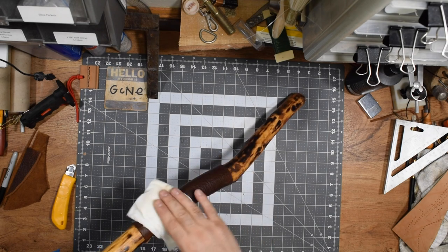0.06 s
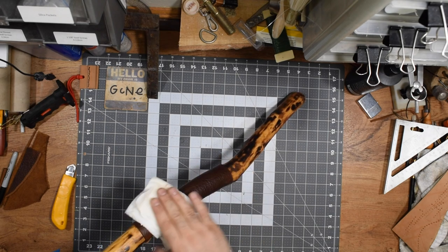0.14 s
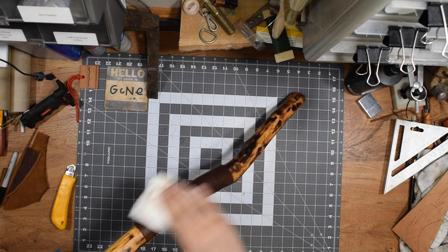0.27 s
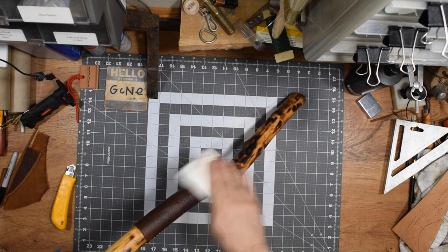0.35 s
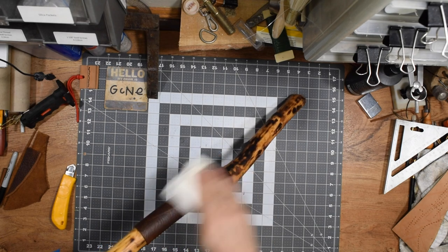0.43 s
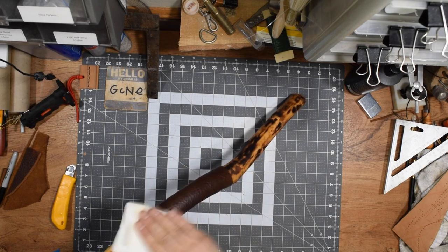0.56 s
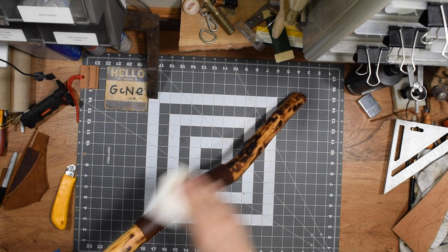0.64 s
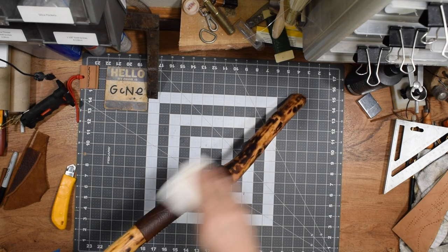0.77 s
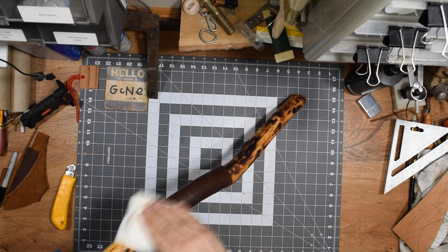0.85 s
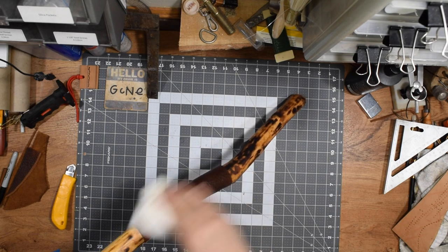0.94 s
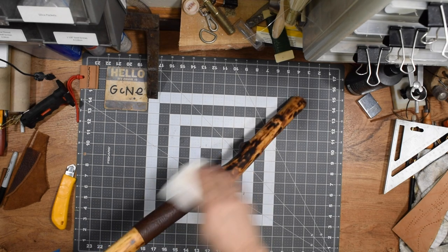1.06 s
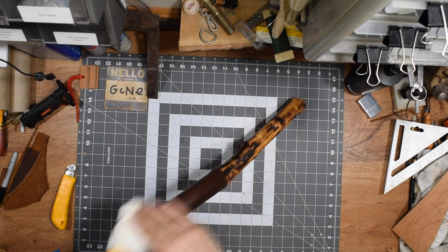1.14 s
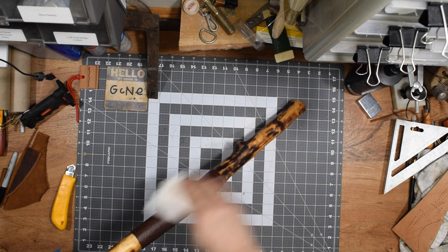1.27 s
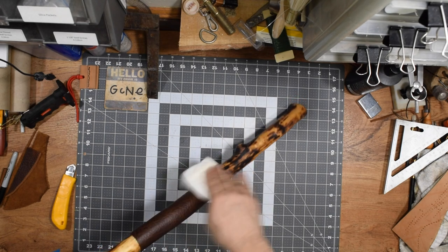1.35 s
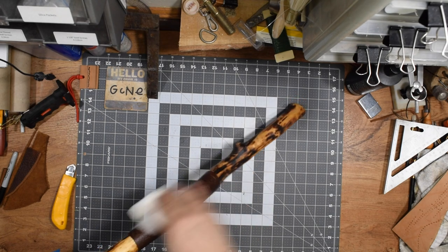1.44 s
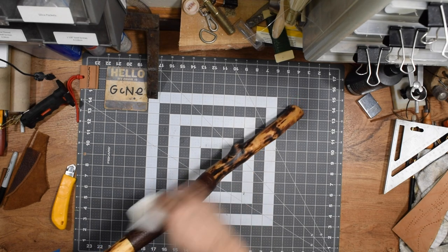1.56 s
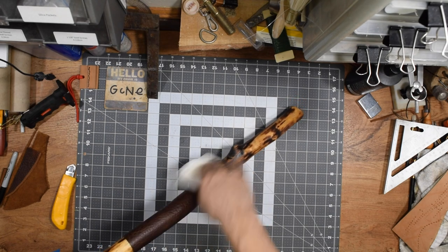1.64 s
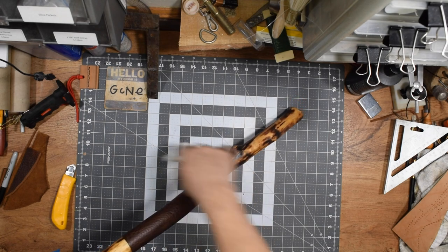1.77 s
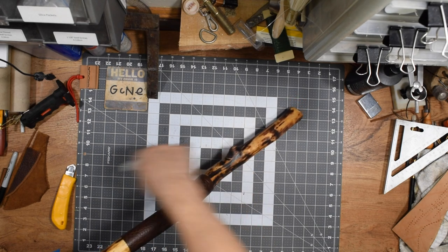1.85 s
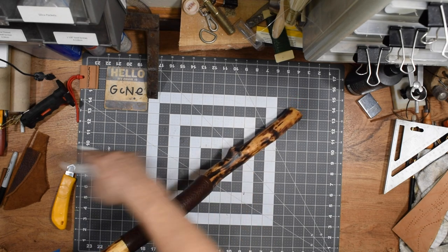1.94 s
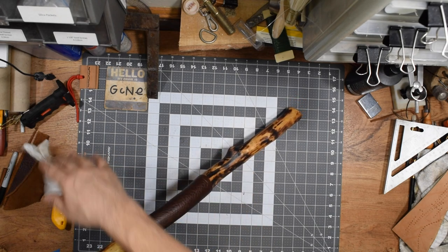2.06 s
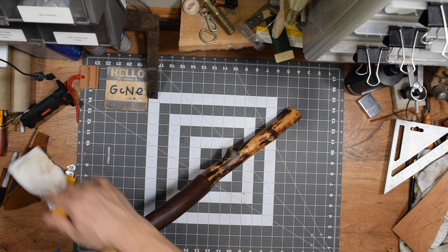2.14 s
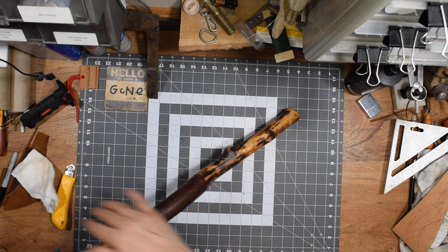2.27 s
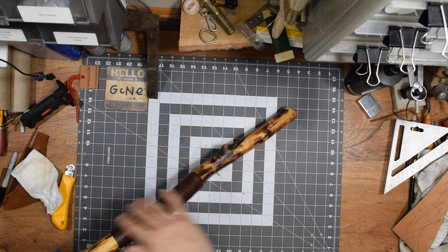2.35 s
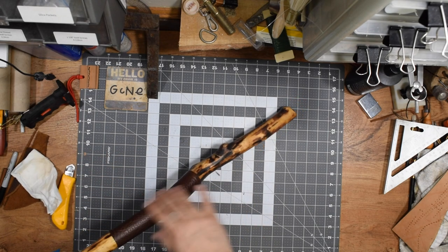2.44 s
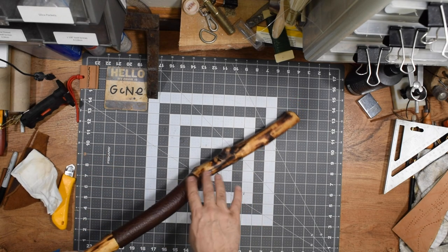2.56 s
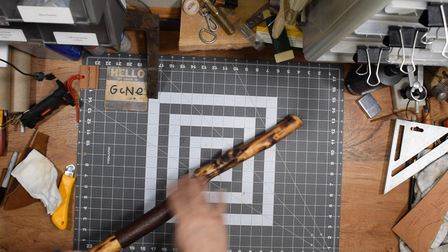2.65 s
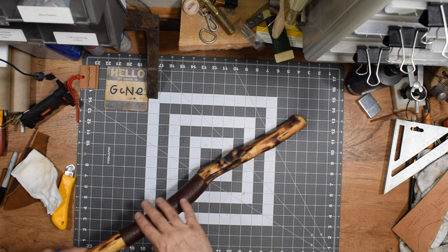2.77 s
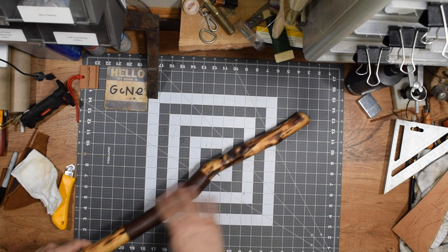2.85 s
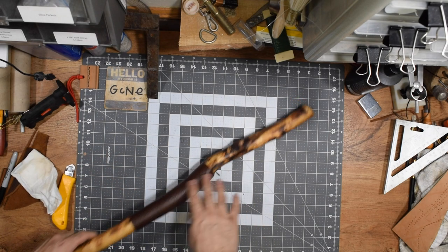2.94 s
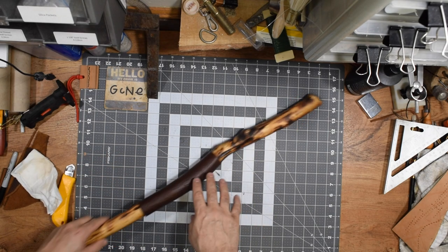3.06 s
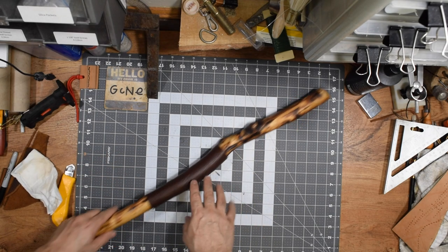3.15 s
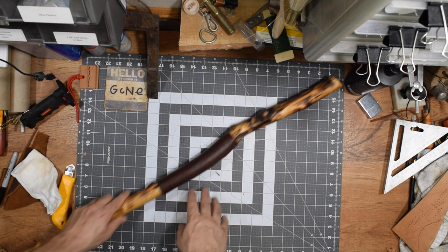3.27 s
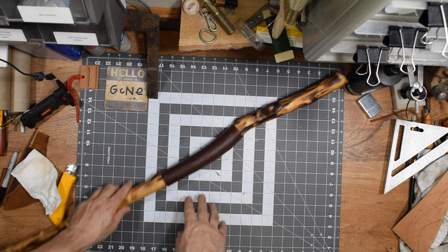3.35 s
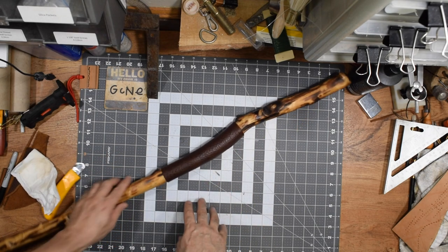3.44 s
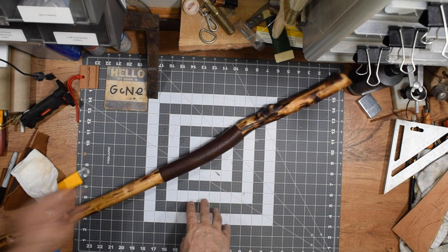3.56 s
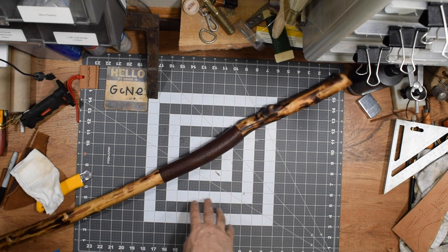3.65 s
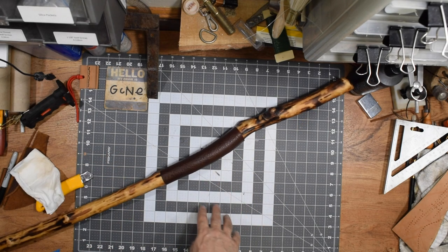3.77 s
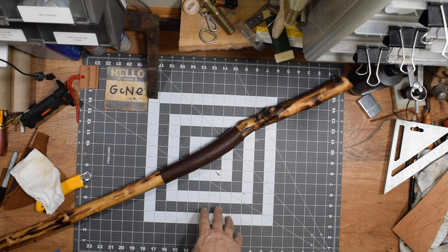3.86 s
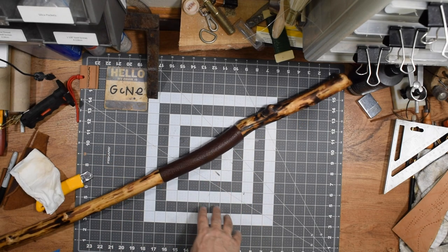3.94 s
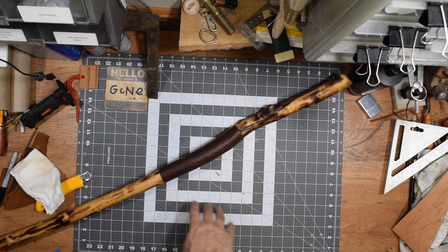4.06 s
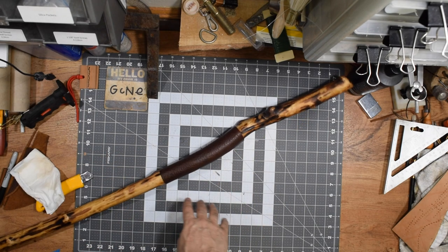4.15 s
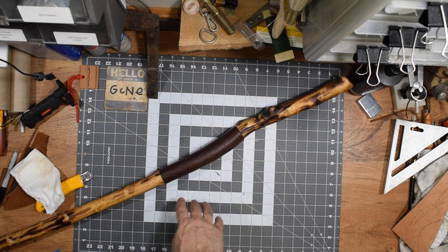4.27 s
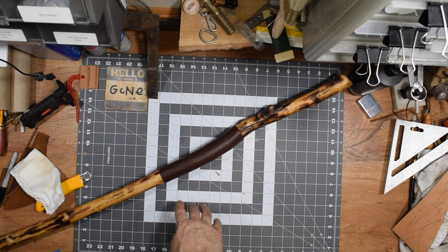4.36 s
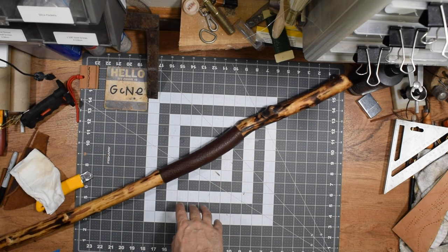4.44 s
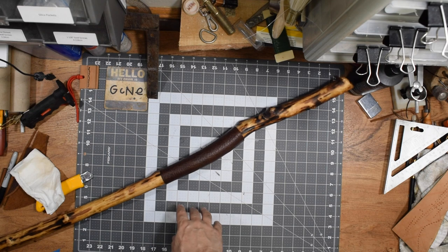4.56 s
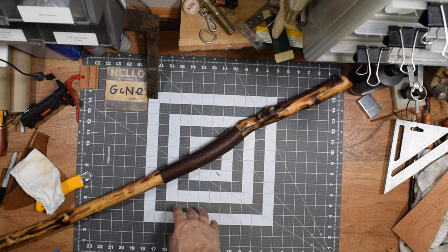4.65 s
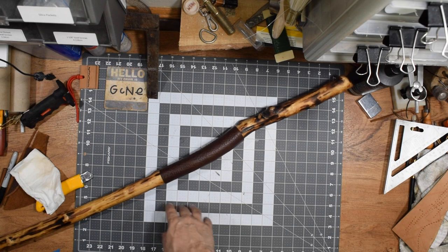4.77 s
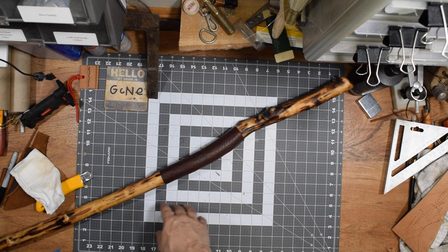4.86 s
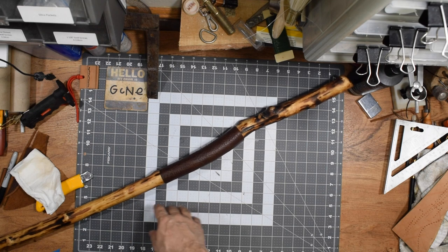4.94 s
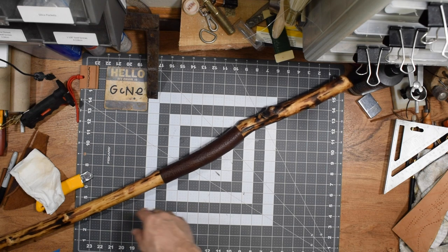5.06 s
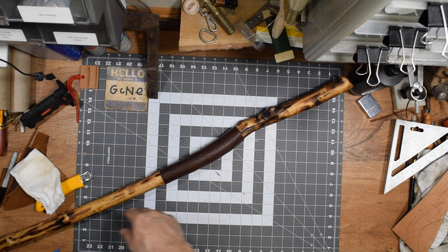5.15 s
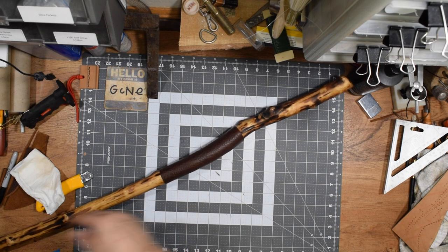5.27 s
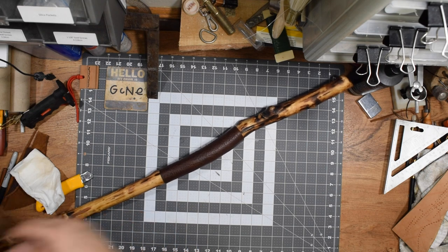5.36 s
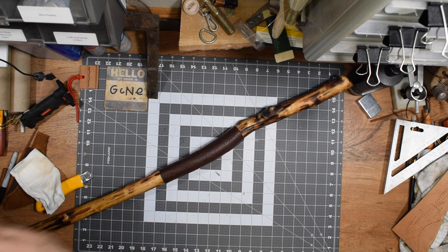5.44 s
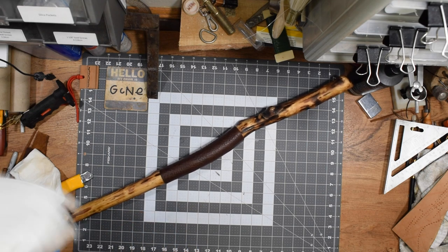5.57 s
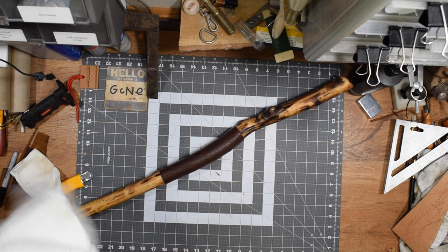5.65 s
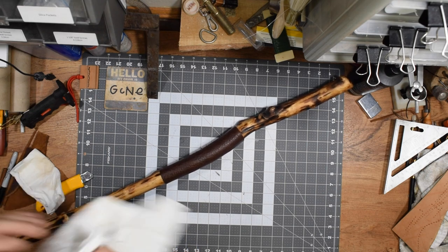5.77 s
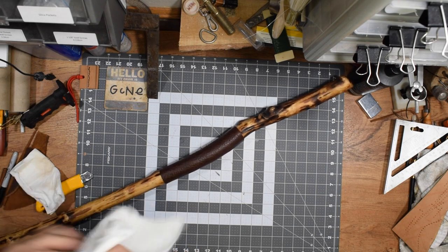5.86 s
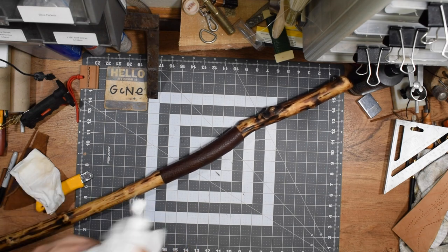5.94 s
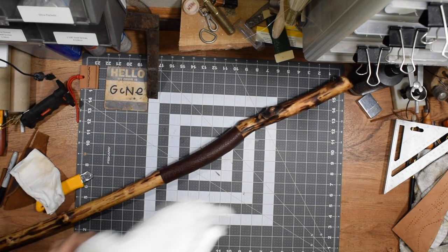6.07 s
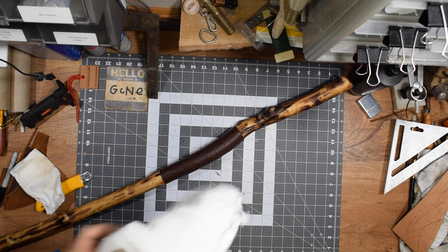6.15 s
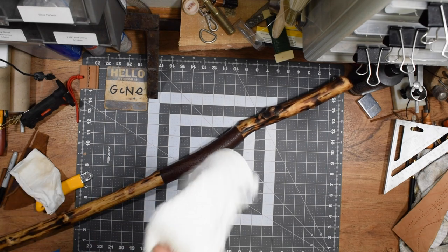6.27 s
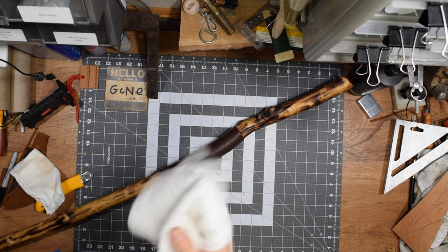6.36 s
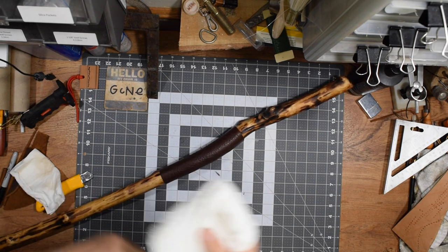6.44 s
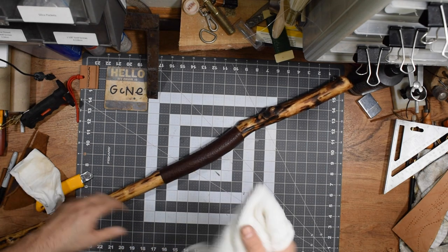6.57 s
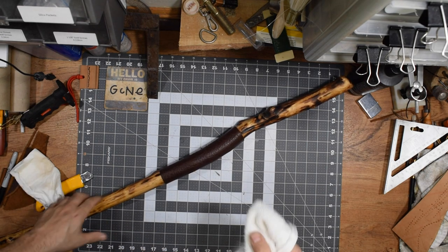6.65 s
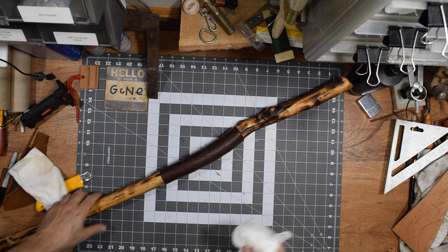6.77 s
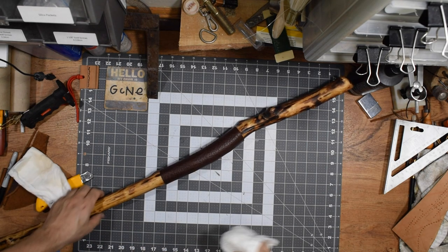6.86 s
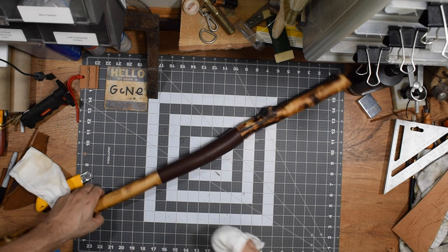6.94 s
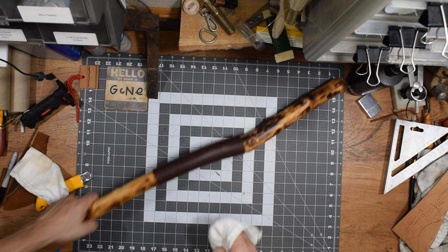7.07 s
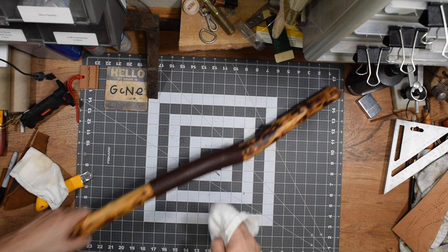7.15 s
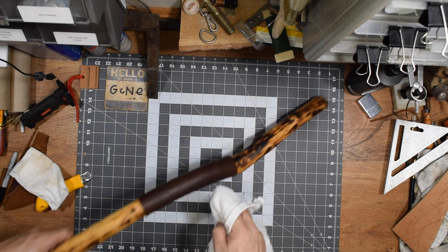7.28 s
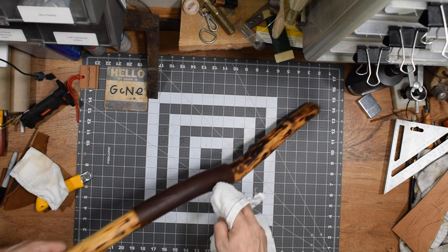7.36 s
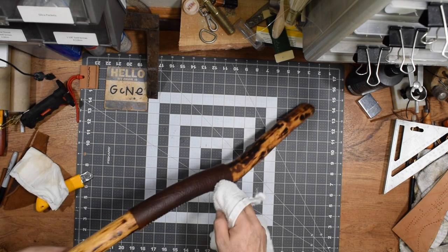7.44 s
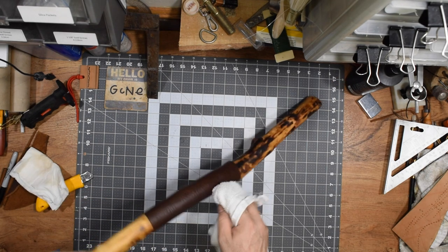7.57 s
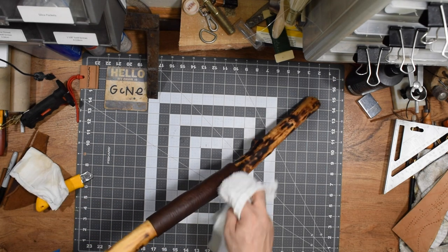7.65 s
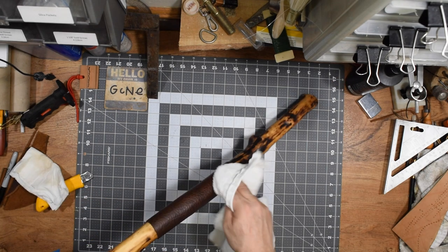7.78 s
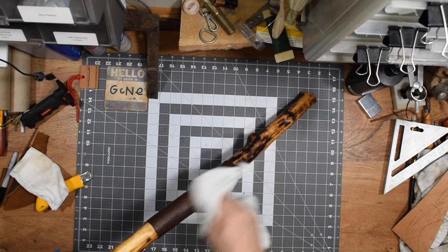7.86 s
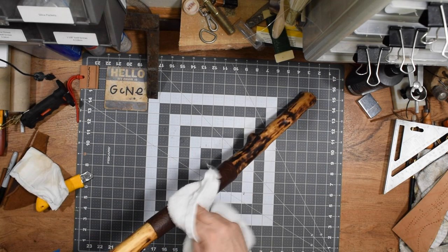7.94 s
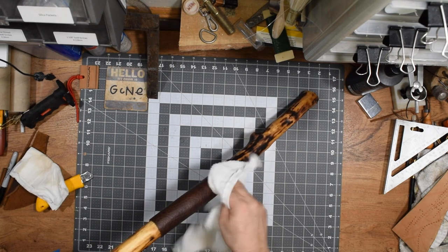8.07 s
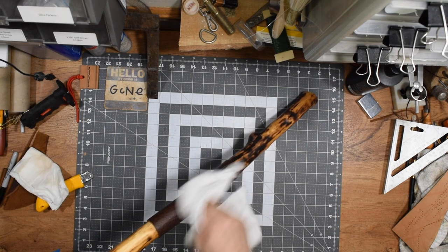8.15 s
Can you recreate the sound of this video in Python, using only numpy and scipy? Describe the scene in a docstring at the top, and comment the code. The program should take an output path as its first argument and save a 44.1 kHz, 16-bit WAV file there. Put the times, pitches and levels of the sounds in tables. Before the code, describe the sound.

Short, breathy cloth strokes over wood give way to quiet handling and small hollow tool taps, then a violent thump and a cluster of woody clacks as the stick is laid down. A brief metal clatter follows a pause. Cloth swishes softly, the stick bumps and cracks against the bench again, and wiping resumes. Close bench-coupled pickup with low rumble, slight room reverberation and a faint hush.

```python
"""At a workbench in a room, a rag rubs a wooden stick, which is dragged, dropped and knocked; metal rattles.
Rubbing and dragging are thousands of tiny slips; cracks and clatter are short bursts of shaped noise.
The microphone is coupled to the bench, so pushes and blows boom in the bench's low modes, its ringing pitches.
Small taps ring a hollow tool, jolts sway the microphone stand, and a faint hush lies under it all."""
import sys
import numpy as np
from scipy import signal
from scipy.fft import rfft, irfft
from scipy.io import wavfile
from scipy.ndimage import uniform_filter1d

SR = 44100
rng = np.random.default_rng(int(sys.argv[2]) if len(sys.argv) > 2 else 0)


def generate_wav(sig):
    """Save sig (samples, or channels by samples) to the path in sys.argv[1] as 16-bit PCM at SR."""
    pcm = np.round(np.clip(np.atleast_2d(sig).T, -1, 1) * 32767).astype(np.int16)
    wavfile.write(sys.argv[1], SR, pcm)


N = 362061
T = np.arange(N) / SR


def gain_of(db):
    """Decibels to gain."""
    return 10 ** (np.asarray(db) / 20)


def evened(x):
    """Scales a signal to an average strength (rms) of 1."""
    return x / np.sqrt(np.mean(x ** 2) + 1e-20)


def read(points, hz):
    """Reads a table between its points, on a log-frequency axis."""
    f, value = np.transpose(points)
    return np.interp(np.log(hz + 1), np.log(f + 1), value)


def add(mix, s, sound):
    """Mixes a sound in, starting at s seconds."""
    part = mix[int(s * SR):][:len(sound)]
    part += sound[:len(part)]


def ring(x, hz, width):
    """A mode struck by x: a unit click rings with peak 1, and a wider mode dies sooner."""
    pole = np.exp((2j * np.pi * hz - np.pi * abs(width)) / SR)
    return signal.lfilter([1], [1, -pole], x + 1e-18).imag


def slow(hz):
    """Smooth chance that changes about hz times a second."""
    size = max(int(SR / hz), 2)
    return evened(uniform_filter1d(uniform_filter1d(rng.standard_normal(N), size), size))


def random_colour(bands, frames):
    """Random variation over frequency and time, smoothed over this many bands and frames."""
    grid = rng.standard_normal((257, N // 128 + 9))
    return evened(uniform_filter1d(uniform_filter1d(grid, bands, 0), frames, 1))


def shaped(x, db):
    """Colours x by a field of dB over frequency and time, each moment of the field evened to rms 1."""
    hz, t, z = signal.stft(x, SR, nperseg=512, noverlap=384)
    field = gain_of(db(hz[:, None], t))
    field = field / np.sqrt(np.mean(field ** 2, axis=0))
    return signal.istft(z * field, SR, nperseg=512, noverlap=384)[1][:N]


def level(rows, edge_s):
    """Gain and colour of gestures that fade in, swell or sag, and fade out."""
    gain, colour = np.full(N, 1e-9), np.zeros(N)
    for s, length, db, swell_db, tilt in rows:
        t = np.arange(0, length, 1 / SR)
        fade = np.sin(np.pi / 2 * np.clip(np.minimum(t, length - t) / edge_s, 0, 1))
        shape = fade * gain_of(db + swell_db * (t / length - .5))
        add(gain, s, shape)
        add(colour, s, tilt * shape)
    return gain, colour / gain


def friction(rows, edge_s, spectrum, slips_per_s, spread_db, vary_db):
    """Dense slips of fibres, some larger, under the level of each stroke; the colour varies at random."""
    slips = rng.standard_normal(N) * (rng.random(N) < slips_per_s / SR)
    slips = evened(slips * gain_of(spread_db * np.minimum(rng.exponential(1, N), 4)))
    gain, tilt = level(rows, edge_s)
    variation = random_colour(8, 12)

    def colour_db(hz, t):
        brightness_db = np.interp(t, T, tilt) * np.log2(hz / 5000 + 0.063)
        return read(spectrum, hz) + brightness_db + vary_db * variation[:, :len(t)]

    return shaped(slips, colour_db) * gain


# The tone colour of the background hush. Each row: frequency in Hz, relative strength in dB per Hz.
HUSH_COLOUR = [(34, -31.5), (58, -2.5), (77, -2.5), (211, -11.5), (280, -25), (390, -17.5), (541, -36),
               (887, -35), (3160, -33), (3810, -34), (8480, -32.5), (14900, -38), (16000, -46)]
HUSH_DB = -65.5


def hush():
    """A faint steady hush of the room and microphone, its colour varied slightly at random."""
    hz = np.fft.rfftfreq(N, 1 / SR)
    steady = evened(irfft(rfft(rng.standard_normal(N)) * gain_of(read(HUSH_COLOUR, hz)), N))
    variation = random_colour(6, 30)
    return gain_of(HUSH_DB) * shaped(steady, lambda hz, t: 3 * variation[:, :len(t)])


# Hands and stick shoving the bench. Each row: start in seconds, length in seconds, force level in dB,
# swell over its length in dB, hardness in dB per octave.
SHOVES = [(.1, 0.33, -45.5, -21, -10.5), (.43, 0.27, -46.5, -19, 0), (.64, 0.32, -45.5, -8.5, 3.5),
          (.95, 0.15, -43.5, -14, -1), (1.1, 0.18, -36, 4, -3.5), (1.37, 0.29, -38, -11, 4),
          (1.69, 0.1, -36.5, -17, -8.5), (1.84, 0.17, -55, -1, -10), (2.125, .06, -32, 0, 4),
          (2.25, 0.15, -48, 6, 8), (2.38, .1, -34.5, -8, 4.5), (2.48, 0.52, -39, 4.5, 2.5),
          (2.97, 0.088, -33.5, -6, 10), (3.18, 0.048, -34, 1, -5), (3.33, 0.038, -18, 19, -12),
          (3.4, .14, -18, 15.5, 4.5), (3.635, 0.6, -38, -46, -7), (4.17, 0.29, -51, -2, 0),
          (4.46, 0.25, -51, 1, 0), (4.72, 0.037, -41, -8, -5), (4.96, .28, -56, -16, 4),
          (5.55, 0.11, -49, -25, -2.5), (5.73, 0.28, -59, -14, 2), (6.04, 0.36, -58, -6, 7),
          (6.28, 0.25, -63, -9, 12), (6.76, 0.19, -35.5, 1, -4.5), (6.98, 0.12, -40, -37, 2.5),
          (7.28, 0.076, -32.5, -12, 5), (7.4, 0.2, -32.5, 2.5, 3.5), (7.73, 0.29, -39, -12, 2.5),
          (8.03, 0.11, -39, -1, 3), (8.13, 0.11, -24, 9, -6)]
# The low modes of the bench top, for shoves and blows. Each row: pitch in Hz, relative level in dB,
# basic time to fade by 60 dB in seconds.
BENCH_MODES = [(62.5, -29.5, 0.081), (86.1, -12.5, 0.18), (96.2, 1.5, 0.12), (122, -8, 0.24),
               (145.7, 6.5, 0.15), (183.7, -3.5, 0.11), (213.3, -5.5, 0.23), (226.7, -11.5, 0.31),
               (280.8, -8.5, 0.17), (326, -18.5, 0.23), (391.5, -10.5, 0.11), (478.6, -20.5, 0.069),
               (575, -22.5, 0.045), (711, -29.5, 0.046), (935, -44.5, 0.086)]
SHOVE_EDGE_S = 0.023


def shoves():
    """A lumpy rubbing force drives the bench modes; hard contact favours the high ones."""
    gain, hard = level(SHOVES, SHOVE_EDGE_S)
    lumps = gain_of(3 * slow(20))
    force = rng.standard_normal(N) * lumps * gain
    out = np.zeros(N)
    for hz, mode_db, t60 in BENCH_MODES:
        drive = ring(force * gain_of(hard * np.log2(hz / 120)), hz, 1.856 * hz)  # the force near the mode
        ringing = ring(drive, hz, 2.38 / t60)
        out += gain_of(mode_db - 43.0) * ringing * np.sqrt(hz / SR)
    return out


# Blows on the bench. Each row: start in seconds, peak level in dB, hardness in dB per octave,
# favoured pitch in Hz (the spot struck swings most near it).
BLOWS = [(0.123, -33, -31, 80), (0.277, -45, -13, 85), (0.454, -42, -3, 85), (0.65, -39.5, 4, 139),
         (0.738, -46, -20, 87.7), (0.959, -40, -10, 96.9), (1.238, -36.5, -9, 147), (1.382, -40, 8.5, 152),
         (1.842, -38.5, -22, 127), (1.918, -43.5, -21, 83), (2.138, -34, 8.5, 137), (2.21, -32, 7, 185),
         (2.254, -31, 7.5, 175), (2.403, -40, 2, 146), (2.544, -37, -5.5, 80), (2.654, -37.5, 5.5, 133),
         (2.752, -35, -5.5, 175), (3.117, -4, -3.5, 100), (3.189, -21.5, -17, 79), (3.346, -29, -6, 75.5),
         (3.37, -12, 4.5, 124), (3.489, -17, 5.5, 93), (3.545, -7.5, 0.5, 146), (3.59, -4, 2.5, 137),
         (3.617, -18.5, 3, 143), (3.688, -21, -15, 88), (3.726, -29.5, -4, 75), (4.192, -40, -8, 137),
         (4.234, -34, -22, 147), (4.296, -52, 9, 390), (4.463, -49, 12.5, 395), (4.519, -43.5, 1.5, 133),
         (4.708, -29.5, 7.5, 244), (4.786, -29, 12, 297), (4.791, -17, 8.5, 124), (4.838, -24.5, -17, 158),
         (4.869, -27, 7, 393), (4.946, -29, 1, 372), (4.989, -37.5, 11, 393), (5.587, -34, -6.5, 84),
         (5.882, -54, 7.5, 181), (6.087, -41, -10, 61.6), (6.328, -39.5, -4.5, 61.6), (6.711, -16, -32, 92),
         (6.915, -27, -18, 81.5), (6.94, -31, -14, 121), (6.999, -18, -18, 94), (7.193, -14, 11.5, 133.5),
         (7.209, -18, -3, 81.5), (7.256, -19, -2.5, 85), (7.468, -29.5, 1.5, 149), (7.644, -6.5, 3, 96),
         (7.691, -24, 4, 98), (8.032, -37.5, -10, 93)]
CONTACT_S, HALVING_DB = 0.0062, 31  # contact time; it halves with this much hardness per octave
DAMPING, DAMPING_PER_DB = 0.68, 0.0178  # fade time as a factor; light blows ring longer


def blows():
    """The modes build up while contact lasts, then die away; each blow's mode levels vary a little at random."""
    out, t = np.zeros(N), np.arange(SR // 3) / SR
    hz, mode_db, t60 = np.transpose(BENCH_MODES)[:, :, None]
    swing = np.cos(2 * np.pi * hz * t)
    all_vary_db = 2.5 * rng.standard_normal((len(BLOWS), len(BENCH_MODES), 1))
    for (s, db, hard, spot_hz), vary_db in zip(BLOWS, all_vary_db):
        contact_s = CONTACT_S * 2 ** (-hard / HALVING_DB)
        rise = np.sin(np.pi / 2 * np.clip(t / contact_s, 0, 1)) ** 2
        damp = DAMPING - DAMPING_PER_DB * db
        favour_db = 9.55 * np.exp(-(np.log2(hz / spot_hz) / .2) ** 2)
        hardness_db = hard * np.log2(hz / 120)
        size_db = mode_db + vary_db + favour_db + hardness_db - 60 * t / (t60 * damp)
        blow = rise * (gain_of(size_db) * swing).sum(axis=0)
        add(out, s, gain_of(db) * blow / abs(blow).max())
    return out


# Rag and palm strokes. Each row: start in seconds, length in seconds, level in dB,
# swell over its length in dB, brightness in dB per octave.
STROKES = [(.21, 0.23, -57.5, 21.5, -3), (.455, 0.17, -53, 11.5, -3), (.63, .17, -51.5, -4, -1.5),
           (.8, .16, -55.5, 6, -2), (.96, 0.15, -52.5, -1.5, -2), (1.1, 0.16, -53, 4, -1),
           (1.258, 0.16, -50.5, -3, -1.5), (1.42, 0.17, -51.5, -2, -3.3), (1.578, .17, -52, -8, -2.5),
           (1.74, .27, -71, -4, -6.5), (2.395, .22, -60.5, 3, -3.5), (2.6, 0.16, -70.5, -16, -9.5),
           (5.88, 0.183, -64, 16, 1.5), (6.05, .27, -61, -6.5, -2), (6.25, 0.23, -56.5, -4.5, -0.5),
           (6.47, 0.31, -69, -17, -7.5), (7.85, 0.16, -56.5, 16, -2), (8.03, 0.11, -50.5, -7, -1.3),
           (8.16, .1, -51.5, -7, -1)]
# The tone colour of the rag. Each row: frequency in Hz, relative strength in dB per Hz.
RAG_COLOUR = [(240, -32.5), (400, -3.5), (512, -23.5), (676, -16), (893, -31.5), (1310, -19.5), (1930, -10),
              (2150, -9.5), (3470, -4), (4650, -4), (5190, -4), (8500, 3), (10400, -7.5), (12700, -6),
              (16000, -19)]
STROKE_EDGE_S = 0.048  # the hand slows down to turn


def rag_strokes():
    """Cloth fibres slip over the wood in very dense, nearly even grains."""
    return friction(STROKES, STROKE_EDGE_S, RAG_COLOUR, slips_per_s=15000, spread_db=0.5, vary_db=3.0)


# Hard contacts. Each row: start in seconds, level in dB, brightest pitch in Hz,
# time to fade by 60 dB in seconds, share that rings from 0 to 1.
TICKS = [(1.9206, -54.5, 7360, 0.014, 1), (3.1202, -19.5, 3480, 0.018, 0.75),
         (3.164, -43, 3640, 0.018, 0.9), (3.345, -49.5, 4700, 0.027, 0.9), (3.3738, -26, 1620, 0.04, 0.59),
         (3.471, -49, 3410, 0.016, 1), (3.492, -26, 5050, 0.036, 0.18), (3.5209, -45, 1700, 0.021, 0),
         (3.5511, -32.5, 2240, 0.025, 0.52), (3.592, -27, 4730, 0.026, 0.52),
         (3.621, -34.5, 2070, 0.018, 0.77), (3.64, -40, 1210, 0.015, 0.8), (3.6685, -47, 1200, 0.031, 0.8),
         (4.7069, -43, 1130, 0.065, 0.85), (4.7843, -26.5, 1420, 0.026, 0.71),
         (4.9496, -38, 1330, 0.029, 0.4), (5.5944, -59, 1323, 0.023, 0.6),
         (6.0921, -42.5, 7700, 0.02, 0.72), (6.9107, -51.5, 2300, 0.035, 0.77),
         (6.9571, -47, 7360, 0.016, 0.9), (7.0235, -46.5, 4920, 0.062, 0.8),
         (7.198, -13.5, 4300, 0.0097, 0.57), (7.233, -40.5, 4000, 0.02, 0.8),
         (7.4413, -49, 1330, 0.029, 0.74), (7.565, -50, 1400, 0.034, 0.66),
         (7.6457, -19, 3200, 0.012, 0.59), (7.6674, -40, 1390, 0.024, 0.76),
         (8.0436, -58, 7820, 0.014, 0.9)]
# The tone colour of the broad crack. Each row: frequency in Hz, relative strength in dB per Hz.
CRACK_COLOUR = [(410, -32.5), (700, -6.5), (1350, -19.5), (3370, -4), (4610, 1), (5990, -10.5), (7390, 0.5),
                (11400, -23.5), (16000, -42.5)]
ECHO_S, ECHO_DB = 0.001054, -13  # the bench top throws each crack back
RING_WIDTH, LOW_CUT = 0.34, 0.32  # as shares of the brightest pitch


def ticks():
    """A brief broad crack, a share of it ringing near its brightest pitch, with a faint longer tail."""
    out, t, hz = np.zeros(N), np.arange(4096) / SR, np.fft.rfftfreq(4096, 1 / SR)
    for s, db, bright_hz, t60, share in TICKS:
        noise = rng.standard_normal(len(t))
        noise[SR // 1500] += 7.0  # one clean impact leads the chatter
        broad = evened(irfft(rfft(noise) * gain_of(read(CRACK_COLOUR, hz))))
        width = RING_WIDTH * bright_hz
        body = evened(ring(ring(noise, bright_hz, width), bright_hz, width))
        fade = gain_of(-60 * t / max(t60, .003)) + 0.018 * gain_of(-60 * t / .09)
        rise = np.clip(t / 0.00092, 0, 1)
        share = np.clip(share, 0, 1)
        tick = gain_of(db) * fade * rise * (share * body + (1 - share) * broad)
        tick = signal.lfilter(*signal.butter(2, LOW_CUT * bright_hz, "high", fs=SR), tick)
        add(out, s, tick)
        add(out, s + ECHO_S, gain_of(ECHO_DB) * tick)
    return out


JOLT_STEEP, STILL_DB = 2.3, -85  # steepness of each swell; level of the sway between jolts


def swell(s, db, rise):
    """Builds up to a peak and dies away."""
    u = np.maximum(T - s, 0) / rise
    return gain_of(db) * (u * np.exp(1 - u)) ** JOLT_STEEP


# Jolts that set the microphone stand swaying. Each row: start in seconds, peak level in dB,
# time to the peak in seconds.
JOLTS = [(2.11, -70, 0.03), (3.11, -56, .05), (5.561, -49.5, .04), (6.05, -44, 0.063),
         (6.299, -42.5, 0.056), (7.17, -36, 0.025), (7.61, -47, 0.041)]
# The stand swings freely after the stick is dropped. The one row: start in seconds, peak level in dB,
# time to the peak in seconds, pitch in Hz.
FREE_SWING = (3.5, -41.5, .5, 16.5)


def sway():
    """A slow wobble below the bench modes swells after each jolt, and one free swing is a pure low tone."""
    band = signal.butter(3, [20, 34], "band", fs=SR, output="sos")
    size = gain_of(STILL_DB) + sum(swell(*row) for row in JOLTS)
    wobble = evened(signal.sosfilt(band, rng.standard_normal(N))) * size
    s, db, rise, hz = FREE_SWING
    return wobble + swell(s, db, rise) * np.sin(2 * np.pi * hz * T)


# A small hollow tool nudged on the bench. Each row: start in seconds, level in dB,
# hardness in dB per octave, favoured pitch in Hz.
TAPS = [(2.147, -59.5, 5, 2240), (2.212, -53.5, -7.5, 2240), (2.258, -51, 1, 3130),
        (4.4632, -55.5, -1, 1460)]
# The modes of the tool. Each row: pitch in Hz, relative level in dB,
# time to fade by 60 dB in seconds (taps() cuts long ones to 1/16 s).
TOOL_MODES = [(1810, -6.5, 0.082), (2230, -5.5, 0.088), (2530, -20, .03), (3050, -6, 0.12),
              (3930, -14, 0.047), (910, -6.5, 0.019), (1460, -3, 0.0094), (460, -6, .03)]


def taps():
    """Each nudge rings the tool's short modes, a little differently every time."""
    out, t = np.zeros(N), np.arange(4096) / SR
    for s, db, hard, spot_hz in TAPS:
        rough = 1 + 0.2 * evened(uniform_filter1d(rng.standard_normal(len(t)), 60))
        ringing = np.zeros(len(t))
        for hz, mode_db, t60 in TOOL_MODES:
            favour_db = 6.6 * np.exp(-(np.log2(hz / spot_hz) / 0.14) ** 2)
            size_db = mode_db + hard * np.log2(hz / 2000) + favour_db - 60 * t / min(t60, 1 / 16)
            ringing += gain_of(size_db) * np.sin(2 * np.pi * hz * rng.uniform(1.0, 1.015) * t)
        add(out, s, gain_of(db) * ringing * rough * np.clip(t / 0.0014, 0, 1))
    return out


# The modes of the wooden stick. Each row: pitch in Hz, width in Hz, relative level in dB.
STICK_MODES = [(1386, 43, -1), (2250, 77, -11), (3520, 190, -7), (7350, 160, -18)]
STICK_DB = -55  # how strongly the drags ring it


def stick(force):
    """Dragging wakes the short modes of the wood."""
    modes = sum(gain_of(db) * np.sqrt(width) * ring(force, hz, width) for hz, width, db in STICK_MODES)
    return gain_of(STICK_DB) * modes


# The stick dragged over the mat. Each row: start in seconds, length in seconds, level in dB,
# swell over its length in dB, brightness in dB per octave.
DRAGS = [(2.89, 0.26, -61.5, 14, 0), (3.135, 0.14, -64, 0, 2), (3.345, 0.03, -54.5, 2, 1),
         (3.385, 0.072, -47.5, -11, -2.5), (3.455, 0.037, -47, 14, -1.5), (3.505, 0.072, -50.5, 6, 0),
         (3.605, 0.063, -42.5, -12.5, -5), (3.66, 0.15, -60, -22, -5), (3.84, 0.3, -71.5, -6.5, -3),
         (4.71, 0.078, -55, -7, -6), (4.955, 0.13, -60, -14, -6), (6.75, 0.19, -69.5, 1, 3.5),
         (6.912, 0.029, -57.5, 5, -1), (6.945, .2, -63.5, -17, 2), (7.215, 0.13, -57.5, -20, -2),
         (7.34, 0.0873, -49.5, 24, -5.5), (7.42, 0.054, -46, -12, -6), (7.47, 0.22, -64.5, 4, 3),
         (7.665, 0.29, -67.5, 2, 4)]
# The tone colour of the mat. Each row: frequency in Hz, relative strength in dB per Hz.
MAT_COLOUR = [(240, -49), (400, 8.5), (545, -15.5), (801, -7.5), (949, -23), (1380, -14.5), (1600, -15),
              (2180, -12.5), (2400, -14.5), (3530, -15.5), (6050, -19.5), (7510, -17), (16000, -48.5)]
DRAG_EDGE_S = 0.014


def stick_drags():
    """Sparser, more unequal slips than the rag's scrape along the mat and ring the stick."""
    scrape = friction(DRAGS, DRAG_EDGE_S, MAT_COLOUR, slips_per_s=8000, spread_db=3.0, vary_db=1.0)
    return scrape + stick(scrape)


# Bursts of the rattle. Each row: start in seconds, relative level in dB,
# time to fall to about a third in seconds, brightness in dB per octave.
RATTLES = [(4.782, -24.5, 0.01, -10), (4.7975, -17, 0.01, 4.5), (4.819, -29.5, 0.0092, -6),
           (4.832, -13, 0.0079, 4), (4.843, -19.5, 0.01, -0.8), (4.8606, -10.5, 0.01, -0.5),
           (4.8737, -20.5, 0.0089, 3.5), (4.892, -28.5, 0.016, -1), (4.9175, -37, 0.015, -1),
           (4.9544, -41.5, 0.033, -14)]
# The modes of the loose metal parts. Each row: pitch in Hz, width in Hz, relative level in dB.
METAL_MODES = [(1400, 26, -13), (1810, 32, -15), (1976, 18, -1), (2963, 16, -1.5), (3120, 27, -2.5),
               (4800, 60, -25), (5560, 74, 3.5), (6450, 130, -3), (7230, 83, -4.5), (8900, 250, -9.5)]
# The tone colour of the clatter. Each row: frequency in Hz, relative strength in dB per Hz.
CLATTER_COLOUR = [(290, -49), (500, -37), (831, -9.5), (1160, -22), (1320, 1.5), (1480, -8), (1930, -6.5),
                  (3860, -11.5), (5160, -6.5), (5800, -10.5), (8700, -9), (10700, -21), (16000, -26.5)]


def rattle():
    """Flurries of tiny impacts give a broad clatter and briefly ring the modes of loose metal parts."""
    shake = np.zeros(N)
    for s, db, length, _ in RATTLES:
        rise = np.clip((T - s) / 0.0072, 0, 1)
        shake += gain_of(db) * rise * np.exp(-np.maximum(T - s, 0) / length)
    impacts = rng.standard_normal(N) * (rng.random(N) < 12000 / SR)  # about 12000 a second
    hits = evened(impacts) * shake
    jingle = sum(gain_of(db) * np.sqrt(width) * ring(hits, hz, width) for hz, width, db in METAL_MODES)
    s, tilt = np.transpose(RATTLES)[[0, 3]]
    clatter = shaped(hits, lambda hz, t: read(CLATTER_COLOUR, hz)
                     + np.interp(t, s, tilt) * np.log2(hz / 5000 + .08))
    return gain_of(-60) * jingle, gain_of(-12.5) * clatter


# How long the room rings. Each row: frequency in Hz, time to fade by 60 dB in seconds.
ROOM_FADE = [(200, .5), (1000, .7), (4000, .9), (9000, .9), (15000, .75)]


def room(x):
    """Sparse echoes of random sign, each band dying at its own speed."""
    echoes = np.zeros(SR)
    at = np.arange(200, SR - 20, 20)
    echoes[at + rng.integers(0, 20, len(at))] = rng.choice([-1., 1.], len(at))
    hz, t, z = signal.stft(echoes, SR, nperseg=256)
    fade = gain_of(-60 * t / read(ROOM_FADE, hz)[:, None])
    tail = signal.istft(z * fade, SR, nperseg=256)[1]
    return signal.fftconvolve(x, tail / np.linalg.norm(tail))[:N]


def scene():
    """Airborne sounds fill the room; the bench reaches the microphone mostly through its stand."""
    background = hush()
    stiff_stand = signal.butter(5, 56, "high", fs=SR, output="sos")  # the stand passes little below 56 Hz
    boom = signal.sosfilt(stiff_stand, shoves() + blows())
    rubbing = rag_strokes() + stick_drags()
    knocks = ticks() + taps()
    jingle, clatter = rattle()
    wet = gain_of(-8.5) * (rubbing + boom) + gain_of(-18) * knocks + gain_of(-14.5) * clatter
    direct = rubbing + knocks + jingle + clatter + boom
    return (direct + room(wet) + sway() + background)[None]


EDGE_HZ, PEAK = 15900, .5  # top of the band; ceiling of the soft rounding


def record(dry):
    """The loudest peaks round off softly; then the band limit."""
    soft = PEAK * np.tanh(dry / PEAK)
    low_pass = signal.firwin(511, EDGE_HZ, window=("kaiser", 9), fs=SR)
    return signal.oaconvolve(soft, low_pass[None], "same")


dry = scene()
out = record(dry)
generate_wav(out)
```